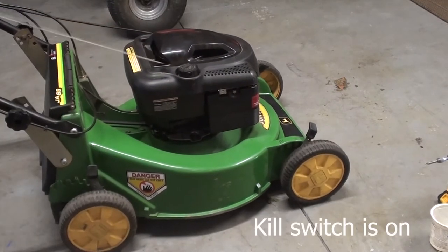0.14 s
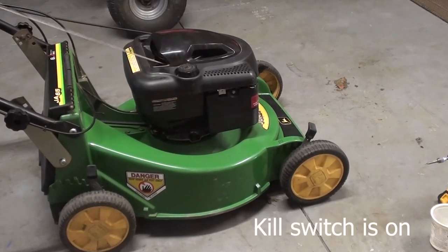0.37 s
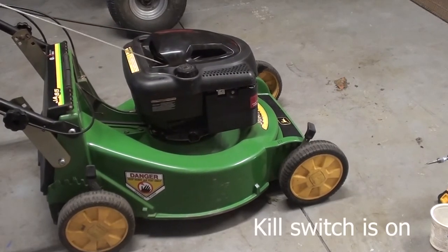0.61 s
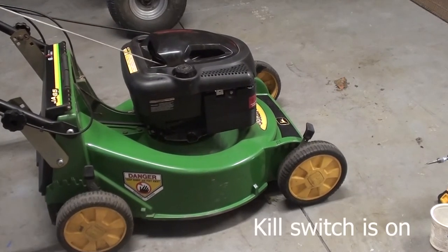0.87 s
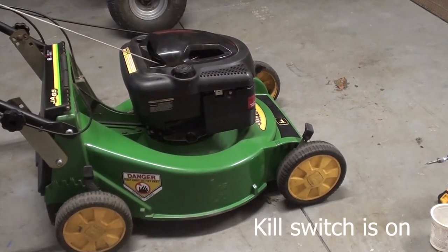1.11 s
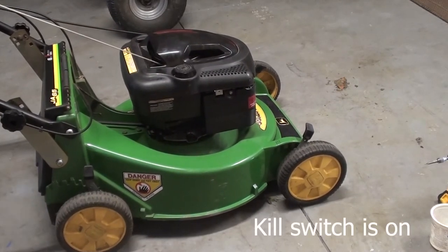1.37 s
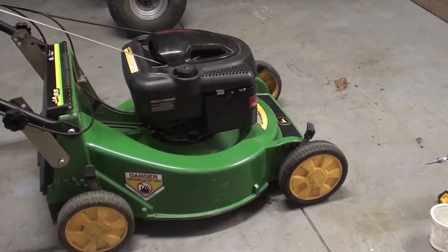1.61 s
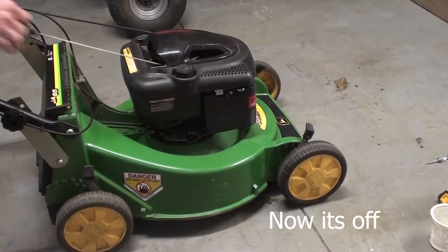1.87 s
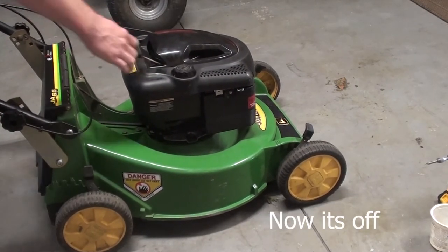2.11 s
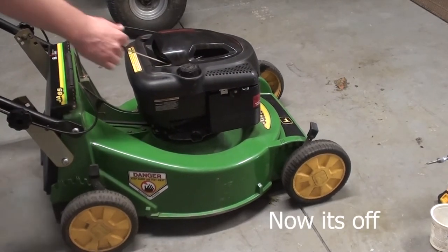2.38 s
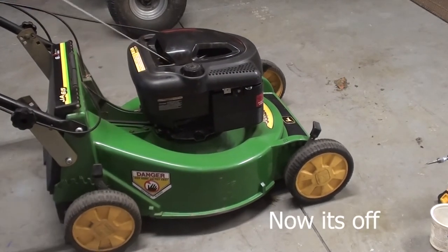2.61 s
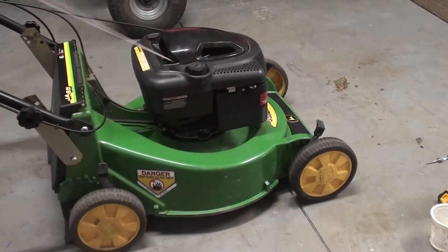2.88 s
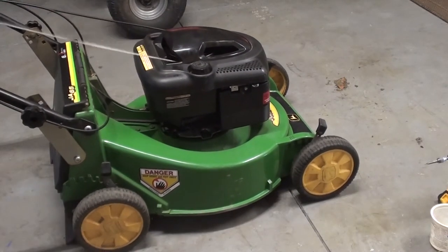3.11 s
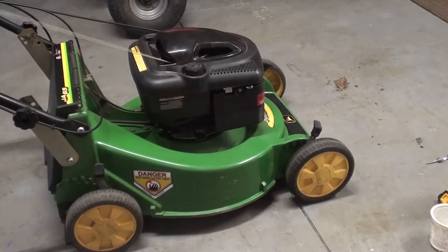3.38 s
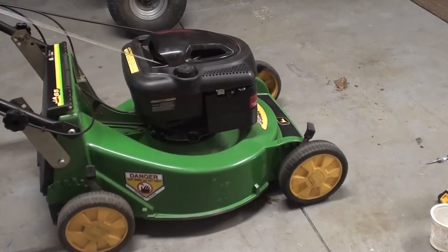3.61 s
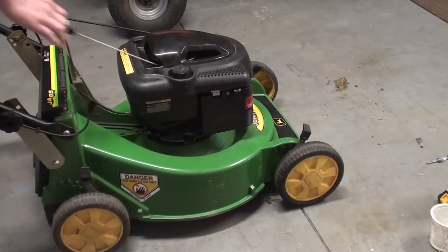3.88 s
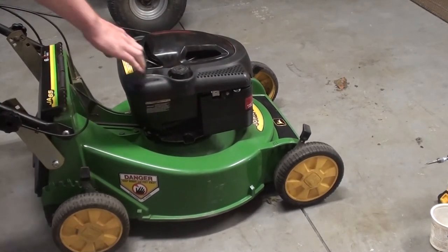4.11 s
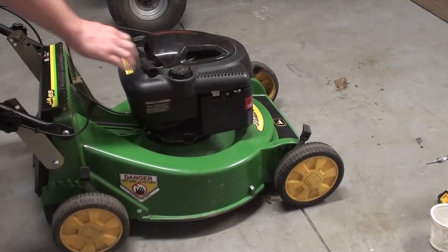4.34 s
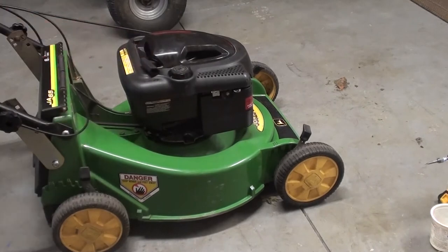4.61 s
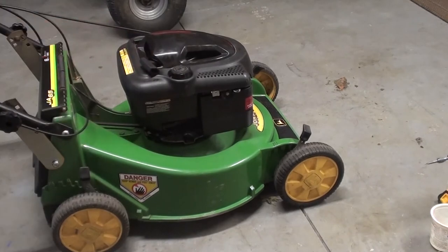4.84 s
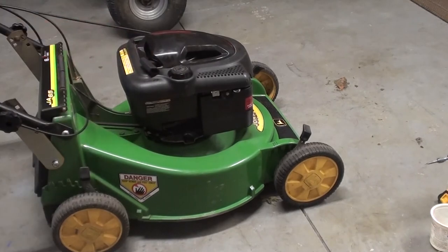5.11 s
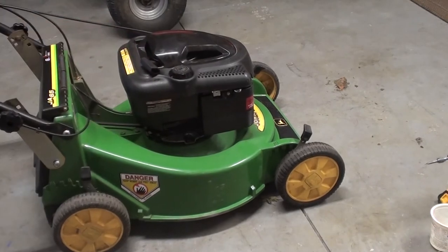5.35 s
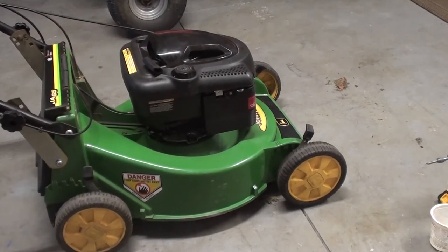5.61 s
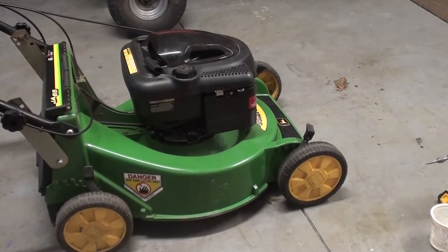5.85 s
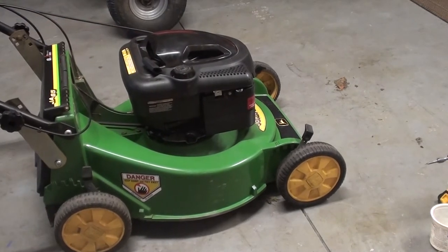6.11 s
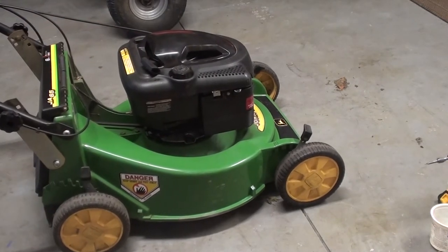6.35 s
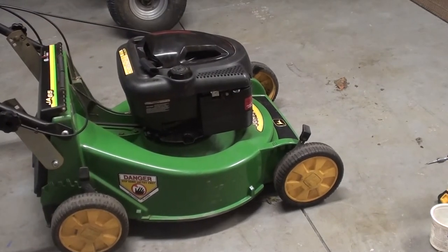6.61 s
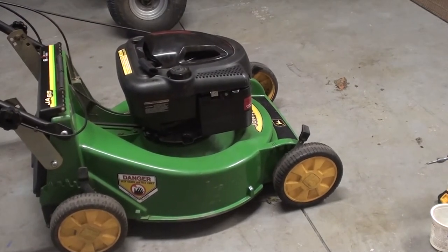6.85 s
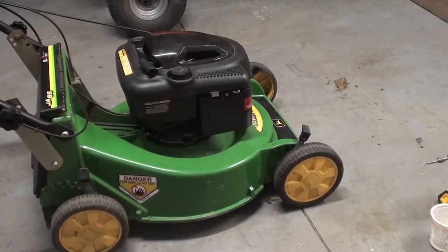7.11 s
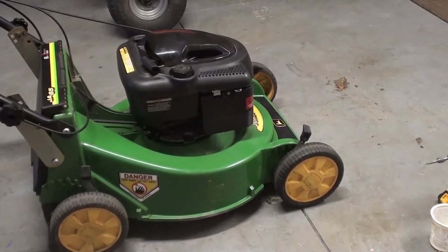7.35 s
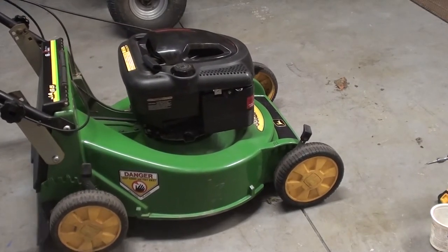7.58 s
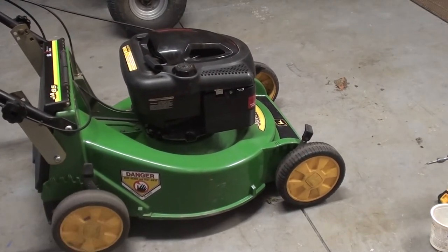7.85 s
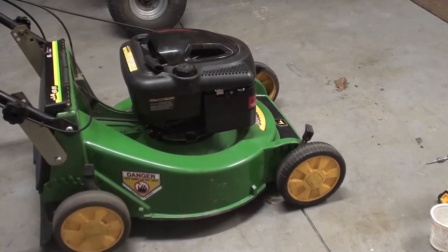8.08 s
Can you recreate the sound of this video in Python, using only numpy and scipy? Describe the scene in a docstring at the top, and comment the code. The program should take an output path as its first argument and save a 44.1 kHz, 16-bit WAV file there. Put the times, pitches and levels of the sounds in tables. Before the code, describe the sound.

Quiet foot scrapes and clicks, a sharp ratcheting cord pull with plastic slaps, then a one-cylinder lawn mower engine catches and runs on steadily.

```python
"""Feet shuffle, clothes rustle and a handle bar ticks and squeaks in a concrete garage, on a mono camera microphone.
Then the starter cord is yanked: the pawls catch, the steel cup rings and rope and grip slap the plastic cover.
The one-cylinder four-stroke engine of a push mower stumbles up to its governed speed and runs on.
Puffs through a filter make the exhaust note; shaped noise makes roar, clatter, panels and scrapes; decaying
sines make the blows. Filtered noise makes the low sway of air and hand at the microphone."""
import sys
import numpy as np
from scipy import signal
from scipy.fft import rfft, irfft, next_fast_len
from scipy.io import wavfile
from scipy.ndimage import uniform_filter1d, map_coordinates

SR = 44100
rng = np.random.default_rng(int(sys.argv[2]) if len(sys.argv) > 2 else 0)


def natural_amplitude(level_db):
    """Convert a level in decibels to a linear amplitude factor, elementwise."""
    exponent = np.asarray(level_db, float) / 20
    return 10 ** exponent


def log_audio(samples):
    """Write samples as a 16-bit WAV file to the path given in sys.argv[1]."""
    # one column per channel
    frames = np.atleast_2d(samples).T
    # limit to full scale, then quantise
    limited = np.clip(frames, -1, 1)
    pcm = np.round(limited * 32767).astype(np.int16)
    wavfile.write(sys.argv[1], SR, pcm)


N = 362502
T = np.arange(N) / SR  # time_s of each sample
M = 2 * next_fast_len(N // 2 + SR // 4)  # padded length of the whole-scene filters, samples
F = np.fft.rfftfreq(M, 1 / SR)  # their bins, hz

# In spectra and mode lists the level is relative; the sources set the final loudness.

# Air and hand sway at the microphone [time_s, level_db]
SWAY_LEVEL = [(0.0, -27), (0.13, -31), (0.64, -33.5), (0.78, -46), (1.28, -43.5), (1.36, -30.5), (1.8, -41),
              (1.97, -27.5), (2.13, -39), (2.22, -32), (2.33, -40), (2.5, -29), (2.8, -22), (2.95, -29),
              (3.25, -21), (3.64, -30), (3.96, -31), (4.05, -43), (8.22, -42)]
# Colour of that sway [freq_hz, density_db]
SWAY_SPECTRUM = [(1, 7), (4, 9.5), (10, 4.5), (25, -5.5), (50, -15.5), (90, -62)]
# The room's answer [freq_hz, t60_s]
GARAGE_DECAY = [(100, 0.59), (1000, 0.91), (5000, 0.15), (14000, 0.13)]

# Moving about [time_s, shuffle_db, rustle_db]
STIR = [(0.0, -36.5, -47), (0.07, -37, -47), (0.22, -43.5, -52.5), (0.27, -45.5, -51), (0.37, -47, -61),
        (0.47, -58, -68), (0.58, -53.5, -62), (0.7, -62.5, -72), (0.8, -56, -64), (0.94, -55.5, -66),
        (1.2, -52.5, -59.5), (1.25, -50, -50), (1.42, -52.5, -65), (1.61, -47.5, -56.5), (1.76, -59.5, -65),
        (1.83, -54, -56), (1.94, -56.5, -80), (2.29, -53.5, -47), (2.43, -56, -60), (2.47, -36, -55),
        (2.53, -45, -44), (2.56, -44, -49), (2.6, -46, -54), (2.66, -45, -43)]
# Colour of the shuffling feet [freq_hz, density_db]
SHUFFLE_SPECTRUM = [(120, -46), (200, -3), (238, 2), (845, 0.5), (1340, -2.5), (1470, -6.5), (1640, -5.5),
                    (2300, -9.5), (4000, -12), (5200, -26), (8800, -120)]
# Colour of the rustling clothes [freq_hz, density_db]
RUSTLE_SPECTRUM = [(1470, -20), (2500, 2), (3240, -34), (4050, -3), (10400, -2.5), (13200, -4),
                   (15600, -34)]
# Footfalls and bumps [time_s, level_db, hold_s]
THUDS = [(0.07, -36.5, .03), (0.6, -60, 0.018), (1.6, -63, .02), (1.8, -70, .01), (1.93, -60, .01),
         (2.28, -69, .02), (2.54, -59, .03), (2.67, -39, .02)]
# Handle, cable and grip contacts [start_s, relative_level_db, body_over_it_db]
TICKS = [(0.0587, -19.5, -23), (0.2794, -35, -10), (0.338, -42, 4), (0.567, -34, -10), (1.19, -34, 6),
         (1.517, -41, 7), (1.6044, -46, -4), (1.8057, -37.5, 7), (1.865, -36, 2), (2.085, -36, -3),
         (2.1755, -41, -6), (2.4418, -20, -8), (2.4569, -20.5, 14), (2.492, -31, 18), (2.5744, -32, 7),
         (2.6208, -26, 10), (2.652, -15.5, 5.5), (2.689, -16.5, 9)]
# A dry plastic click and its rebound [start_s, level_db]
CLICKS = [(.5283, -33), (.5355, -41)]
# Modes of the cover struck by the grip [freq_hz, relative_level_db, t60_s]
COVER_MODES = [(617, -23, 0.093), (843, -3.5, 0.21), (985, -7, 0.09), (1184, -4, 0.13), (1410, -19, 0.077),
               (1900, -7, .08)]
# Cable spring tightening [time_s, pitch_hz]
SPRING_PITCH = [(1.81, 815), (1.935, 965), (1.955, 925), (2.02, 945), (2.08, 985), (2.12, 1060)]
# Squeaks of that spring [time_s, level_db, hold_s]
SPRING_CREAKS = [(1.815, -56, .08), (1.91, -50, .025), (1.965, -59, .03), (2.09, -59, .025)]
# A second, higher squeak [time_s, pitch_hz]
SHEATH_PITCH = [(1.95, 1050), (2.0, 1095), (2.06, 1100)]
# When it sounds [time_s, level_db, hold_s]
SHEATH_CREAKS = [(1.97, -57, .085)]

# Starter knocks and rope slaps [start_s, relative_level_db, body_over_it_db]
KNOCKS = [(2.707, -15, -14), (2.7581, -17, -10), (2.7887, -3.5, -20), (2.8783, -10, -9), (2.9207, -7, -9),
          (3.03, -4.5, -3.5), (3.1248, -5.5, -0.5), (3.255, -4, -6.5), (3.384, -9.5, -2),
          (3.4245, -7.5, -15), (3.6275, -10, -18), (3.667, -13.5, -4), (3.7485, -11, -21)]
# Bright noise of a contact [freq_hz, density_db]
SLAP_SPECTRUM = [(700, -36), (1500, 7), (3000, 0), (4200, 2), (8000, 0.5), (12000, 4), (14000, 0.5),
                 (15600, -16)]
# Resonances of the plastic cover [freq_hz, width_hz, relative_level_db]
BODY_MODES = [(456, 59, -6.5), (810, 160, -5), (1190, 330, -2), (1470, 930, -2.5)]
# Modes of the steel pawl [freq_hz, relative_level_db, t60_s]
PAWL_MODES = [(4340, -3, 0.039), (4680, -1.5, 0.027), (5430, -8, 0.033), (7300, -7, 0.051),
              (8400, -10, 0.03)]
# Pawls grabbing the cup [time_s, level_db, drag_s]
GRABS = [(2.444, -39.5, .017), (2.724, -34, .004), (2.758, -29, .012), (2.797, -21, .03),
         (2.845, -25, .025), (2.882, -23, .012), (2.93, -38, .03)]
# Resonances of the starter cup [freq_hz, width_hz, relative_level_db]
CUP_MODES = [(3500, 40, -15), (7110, 220, 0), (8450, 330, -2), (9300, 300, -11), (10840, 160, -3),
             (13200, 500, -11)]
# The cup's lowest mode singing [time_s, level_db, hold_s]
SQUEALS = [(2.82, -32, .09), (2.94, -36, .07), (2.447, -50, .04)]
# Recoil ratchet, jerks of the cord [time_s, level_db, hold_s]
RATCHET_JERKS = [(0.0, -37, .005), (0.062, -33.5, 0.0043), (0.258, -46.5, 0.035), (0.34, -43.5, .005),
                 (2.5, -49, .03), (2.578, -32, 0.011), (2.622, -45, .008), (2.653, -29, 0.01),
                 (2.692, -28.5, 0.011), (2.77, -31, 0.039)]
# Housing under the ratchet [freq_hz, width_hz, relative_level_db]
HOUSING_MODES = [(1120, 410, -4), (1790, 760, 5), (2020, 680, 2.5), (2450, 120, -11)]
# Rasp of the cord, faster as it runs out [time_s, pitch_hz]
RASP_PITCH = [(2.572, 1550), (2.6, 2000), (2.625, 2600)]
# Pull that makes it rasp [time_s, level_db, hold_s]
RASP_PULL = [(2.578, -40, .04)]

# Crank speed, before a slight waver [time_s, firings_per_s]
SPEED = [(2.66, 11.6), (2.81, 13.9), (3.03, 19.5), (3.13, 21.6), (3.31, 21.6), (3.43, 24.7), (3.52, 25.5),
         (3.74, 25.25), (4.22, 25.9), (4.55, 25.8), (6.31, 25.8), (6.44, 25.7), (7.04, 25.7), (7.18, 26.1),
         (7.37, 26.1), (7.52, 25.7), (7.71, 25.6), (7.85, 25.9), (8.22, 25.75)]
# Main engine layers [time_s, exhaust_db, roar_db, clatter_db]
ENGINE_LEVELS = [(2.6, -44, -37, -65), (2.71, -23, -27.5, -28), (2.87, -19, -21.5, -39),
                 (3.13, -14, -21, -28.5), (3.45, -14.5, -16.5, -22), (3.66, -14, -17.5, -23.5),
                 (3.96, -16, -15.5, -23.5), (4.22, -16.5, -16, -24.5), (4.3, -17, -12.5, -24),
                 (4.38, -17.5, -16, -25), (4.55, -18, -15.5, -24.5), (4.84, -16.5, -17.5, -24.5),
                 (5.14, -16, -18.5, -24), (5.4, -16.5, -18, -25), (7.15, -16, -19.5, -23.5),
                 (7.28, -16.5, -18, -23), (7.66, -15, -20, -26), (8.22, -16.5, -19, -26)]
# Cold running [time_s, firing_scatter_db, ragged_share_0_to_1]
COLD_RUNNING = [(2.6, 3, .92), (3.15, 3, .85), (3.5, 3, .55), (3.8, 2.5, .4), (4.05, 1.1, .03),
                (4.8, .9, .008)]
# Short dips of the exhaust: weak firings of the cold engine [time_s, dip_db]
STUMBLES = [(3.02, -.5), (3.2, -5), (3.54, -6), (3.6, -8), (3.72, -6), (3.845, -5)]
# Exhaust note in five stances as the mower creeps over the floor; each stance [multiple_of_firing_rate, level_db]
STANCE_NOTES = [
    [(1, -7), (2, -5), (3, -11.5), (4, 1.5), (5, 3), (6, 0.5), (7, -10), (8, -9.5), (9, 0.5), (10, -5.5),
     (11, -6.5), (12, -7), (13, -8), (14, -21), (15, -5.5), (16, -5), (17, -9.5), (18, -2.5), (19, -1.5),
     (20, -7), (21, -19), (22, -3), (23, -17), (24, -3), (25, -29), (26, -15), (27, -23), (28, -0.5),
     (29, -13), (30, -16), (31, -19), (32, -16), (33, -28), (34, -21), (35, -27), (36, -23), (37, -13),
     (38, -19.5), (39, -14), (40, -26)],
    [(1, -23), (2, -8.5), (3, -23), (4, 0), (5, 2), (6, -0.5), (7, -20), (8, -10), (9, -4), (10, -25),
     (11, -6), (12, -8.5), (13, -20), (14, -11), (15, -9), (16, -14), (17, -5), (18, -1.5), (19, -5.5),
     (20, -4.5), (21, -23), (22, -9), (23, -6), (24, -19), (25, -9), (26, -22), (27, -24), (28, -3.5),
     (29, -16), (30, -12), (31, -18), (32, -11), (33, -28), (34, -15), (35, -33), (36, -20), (37, -16),
     (38, -8.5), (39, -24), (40, -26)],
    [(1, -18), (2, -10), (3, -17), (4, -1), (5, 1.5), (6, 1.5), (7, -22), (8, -7), (9, -5.5), (10, -12.5),
     (11, -4), (12, -14), (13, -10), (14, -26), (15, -7.5), (16, -15.5), (17, -2), (18, -2.5), (19, 0),
     (20, -12), (21, -34), (22, -3), (23, -4.5), (24, -5.5), (25, -22), (26, -3), (27, -34), (28, -5),
     (29, -41), (30, -6), (31, -29), (32, -14), (33, -16), (34, -25), (35, -22), (36, -9), (37, -24),
     (38, -27), (39, -21), (40, -14)],
    [(1, -17), (2, -12), (3, -24), (4, -0.5), (5, -2), (6, 1.5), (7, -21), (8, -10.5), (9, -5.5), (10, -26),
     (11, -17), (12, -5.5), (13, -15), (14, -20), (15, -20), (16, -26), (17, -9.5), (18, -9), (19, -17),
     (20, -24), (21, -26), (22, -16.5), (23, -12), (24, -0.5), (25, -12), (26, -2), (27, -16), (28, -26),
     (29, -26), (30, -8), (31, -16), (32, -25), (33, -20), (34, -20), (35, -25), (36, -20), (37, -12),
     (38, -4), (39, -37), (40, -18)],
    [(1, -17), (2, -10), (3, -18), (4, -1), (5, 1), (6, 4), (7, -15), (8, -9.5), (9, -5), (10, -13),
     (11, -6.5), (12, -2.5), (13, -11), (14, -21), (15, -8.5), (16, -23), (17, -10), (18, -8), (19, -13),
     (20, -18), (21, -22), (22, -5), (23, -9.5), (24, -5), (25, -13.5), (26, 0), (27, -17), (28, -15),
     (29, -7.5), (30, -14), (31, -20), (32, -17), (33, -24), (34, -15), (35, -21), (36, -28), (37, -10),
     (38, -13), (39, -37), (40, -10)],
]
# Path between the stances [time_s, stance_0_to_4]
STANCE_PATH = [(4.6, 0), (4.9, 1), (5.85, 1.1), (6.1, 2), (7.06, 2.05), (7.16, 3), (7.5, 3), (7.72, 4)]
# Delay of each band of the exhaust pulse, which spreads it over the cycle [freq_hz, delay_s]
PULSE_DELAY = [(60, .034), (90, .022), (116, .038), (142, .0315), (170, .014), (230, .022), (300, .01),
               (400, .008), (440, .01), (520, .005), (600, .018), (680, .002), (760, .024), (900, .012),
               (1100, .03)]
# Colour of the ragged burning [freq_hz, density_db]
RAGGED_SPECTRUM = [(24, -36), (40, -4), (152, 1.5), (209, -6.5), (310, -1), (420, -10), (460, 2),
                   (535, -28), (595, -11), (1500, -24), (1950, -44), (3300, -120)]
# Afterburn in the cold muffler [time_s, level_db, hold_s]
AFTERBURN = [(3.045, -9, .085), (3.2, -15, .12), (3.455, -7, .03), (3.62, -7, .065), (3.79, -12, .01)]
# Muffler chambers that it excites [freq_hz, width_hz, relative_level_db]
CHAMBER_RESONANCES = [(307, 26, -15), (406, 150, -11), (469, 26, -5.5), (595, 13, -13)]
# Single strong firings of the spin-up [start_s, pipe_boom_db, chamber_knock_db]
CHUGS = [(2.75, -22, -24), (2.825, -24, -17), (2.888, -24, -16), (2.95, -20, -22), (3.04, -20, -16),
         (3.085, -12, -18), (3.125, -16, -14), (3.225, -20, -15), (3.37, -17, -16), (3.46, -10, -24),
         (3.662, -10, -24), (3.785, -10, -24), (3.905, -14, -28), (3.943, -13, -28), (3.982, -13, -28)]
# Pipe boom of those firings [freq_hz, relative_level_db, t60_s]
BOOM_MODES = [(147, 0, 0.17)]
# Chamber knock of those firings [freq_hz, relative_level_db, t60_s]
KNOCK_MODES = [(304, 0, 0.14)]
# Colour of the turbulent roar [freq_hz, density_db]
ROAR_SPECTRUM = [(20, -28), (60, -33), (180, -16), (300, -3), (500, 2), (750, -2.5), (1000, -2), (1150, -8),
                 (1350, -5), (2200, -9), (3500, -21), (6000, -38), (12000, -100)]
# Gain of the low part of the roar's free noise [time_s, gain_db]
LOW_ROAR_GAIN = [(4.5, 0), (4.9, -4), (5.6, -5.5), (6.3, -3), (7.0, -3.5), (7.2, 1), (8.22, 1)]
# Colour of the valve clatter [freq_hz, density_db]
CLATTER_SPECTRUM = [(1500, -3.5), (3000, 1), (5000, -4), (8000, -8), (12000, -9), (13800, -13.5),
                    (14400, -12), (14800, -60)]
# Compression strokes at low speed [time_s, level_db]
THUMP_LEVEL = [(2.6, -46), (2.72, -24), (2.95, -29), (3.15, -31), (3.8, -42), (4.1, -60)]
# Thin panel shaken by the engine [freq_hz, width_hz, relative_level_db]
SHROUD_MODES = [(4910, 120, 4)]
# How hard it buzzes [time_s, level_db]
SHROUD_SHAKE = [(3.5, -58), (4.3, -49), (5.3, -40), (6.2, -39.5), (6.58, -38), (7.26, -42), (7.45, -45),
                (8.22, -43)]
# Steel deck [freq_hz, width_hz, relative_level_db]
DECK_MODES = [(1306, 120, 0)]
# The deck ringing up [time_s, level_db, hold_s]
DECK_SURGES = [(4.14, -30, 0.028), (4.42, -27, 0.062), (5.11, -26, 0.053), (6.32, -31, .05)]
# Thin metallic whine [freq_hz, width_hz, relative_level_db]
WHINE_MODES = [(10830, 50, -45), (11520, 45, -45)]
# Its swell and fade [time_s, gain_db]
WHINE_GAIN = [(3.6, -3), (4.1, 9), (4.7, 3), (5.8, 2), (6.1, -13), (6.7, 1), (7.1, 0), (8.0, -1),
              (8.22, -5)]


def unit(x):
    """Scales x to rms 1."""
    return x / np.sqrt(np.mean(x ** 2) + 1e-20)


def along(points, hz):
    """Reads (hz, value) points on a log frequency axis."""
    f, v = np.transpose(points)
    return np.interp(np.log(hz + 1), np.log(f + 1), v)


def curves(rows):
    """One value per sample for each column after the time."""
    s, *cols = np.transpose(rows)
    return [np.interp(T, s, c) for c in cols]


def during(rows, fade=0.011):
    """1 while a table lasts, fading to 0 outside over fade seconds."""
    return np.clip(np.minimum(T - rows[0][0], rows[-1][0] - T) / fade + 1, 0, 1)


def wobble(rate):
    """A smooth random curve with rate knots a second."""
    return map_coordinates(rng.standard_normal(int(N * rate / SR) + 4), [T * rate])


def bursts(rows, rise_s, fall):
    """Gain of (s, dB, hold s) events: a ramp up to the time, a hold, then a fall of so many dB per s."""
    gain = np.zeros(N)
    for s, db, hold in rows:
        ramp = np.clip((T - s) / rise_s + 1, 0, 1) ** 2
        gain += ramp * natural_amplitude(db - fall * np.maximum(T - s - abs(hold), 0))
    return gain


def patchy(x, depth_db, size=512):
    """x with patches of random gain in time and frequency."""
    z = signal.stft(x, nperseg=size)[2]
    field = uniform_filter1d(rng.standard_normal(z.shape), 5, 0)
    field = uniform_filter1d(field, 12, 1)
    return signal.istft(z * natural_amplitude(depth_db * unit(field)), nperseg=size)[1][:N]


def coloured(x, spectrum, delay=((1, 0),)):
    """x through the causal filter with these (hz, dB) gains and (hz, s) delays."""
    # Folding the cepstrum forward gives the minimum-phase response.
    cepstrum = irfft(np.log(natural_amplitude(along(spectrum, F))), M)
    cepstrum[1:M // 2] *= 2
    cepstrum[M // 2 + 1:] = 0
    lag = 2 * np.pi * np.cumsum(along(delay, F)) * F[1]
    return irfft(rfft(x, M) * np.exp(rfft(cepstrum) - 1j * lag), M)[:N]


def hiss(spectrum, patchy_db=None):
    """Coloured noise of rms 1, patchy if asked."""
    white = rng.standard_normal(N)
    if patchy_db:
        white = patchy(white, patchy_db)
    return unit(irfft(rfft(white, M) * natural_amplitude(along(spectrum, F)), M)[:N])


def rattle(peaks, drive=1):
    """Noise shaped by a drive and singing in narrow resonances, each at its own level."""
    response = 0
    for k, (centre, width, db) in enumerate(peaks):
        strength = (-1) ** k * natural_amplitude(db) * np.sqrt(SR / np.pi * width)
        response = response + strength * 1j * F / (centre * centre - F * F + 1j * F * width)
    return irfft(rfft(drive * rng.standard_normal(N), M) * response, M)[:N]


def struck(rows, modes, ring_db, scatter_db=4):
    """Every blow rings the same decaying modes, each at a slightly new strength."""
    out, t = np.zeros(N), T[:SR // 4]
    for s, db in rows:
        for hz, level, t60 in modes:
            strength_db = db + ring_db + level + scatter_db * rng.standard_normal()
            out[round(s * SR):][:len(t)] += natural_amplitude(strength_db - 60 * t / t60) * np.sin(2 * np.pi * hz * t)
    return out


def squeak(rows, gain):
    """Stick-slip as a tone of wavering pitch and level with a weak octave."""
    phase = 2 * np.pi * np.cumsum(curves(rows)[0] * (1 + .008 * wobble(60))) / SR
    return gain * natural_amplitude(2.8 * wobble(50.8)) * (np.sin(phase) + 0.22 * np.sin(2 * phase))


def knocks(rows, t60_top, longer, crack_db, body_db, snap=1.5, snap_t60=0.02):
    """Each contact is a snap, bright noise and a duller burst from the cover; harder ones ring longer."""
    # t60_top: s at 0 dB; longer: s per dB
    bright, dull, t = np.zeros(N), np.zeros(N), T[:SR // 2]
    for s, db, rel_db in rows:
        t60 = max(t60_top + longer * db, .03)
        shape = natural_amplitude(db - 60 * t / t60) * (1 + snap * natural_amplitude(-60 * t / snap_t60))
        bright[round(s * SR):][:len(t)] += shape ** 2
        dull[round(s * SR):][:len(t)] += (shape * natural_amplitude(rel_db)) ** 2
    crack = natural_amplitude(crack_db) * np.sqrt(bright) * hiss(SLAP_SPECTRUM)
    return crack + rattle(BODY_MODES, natural_amplitude(body_db) * np.sqrt(dull))


def microphone_sway():
    """Air and hand sway push the microphone with low noise of drifting level."""
    level_db = curves(SWAY_LEVEL)[0] + 3 * wobble(3.59)
    return natural_amplitude(level_db) * hiss(SWAY_SPECTRUM)


def garage(x):
    """The walls answer 9 ms late, about 3 m of path, and each frequency dies at its own speed."""
    hz, t, z = signal.stft(rng.standard_normal(SR // 2), SR, nperseg=256)
    decay = natural_amplitude(-60 * t / along(GARAGE_DECAY, hz)[:, None])
    tail = signal.istft(z * decay, SR, nperseg=256)[1]
    late = np.pad(x, (400, 0))
    return signal.fftconvolve(late, tail / np.linalg.norm(tail))[:N]


def stirring():
    """Footfalls are low thuds; soles and clothes rub as noise of changing level."""
    shuffle_db, rustle_db = curves(STIR)
    thud_gain = natural_amplitude(-63) + bursts(THUDS, rise_s=0.19, fall=130)  # over a faint steady floor
    stir = thud_gain * hiss([(30, -18), (70, 11.0), (150, 5.5), (250, -11), (500, -30)])
    stir += natural_amplitude(shuffle_db) * hiss(SHUFFLE_SPECTRUM, patchy_db=2.5)
    stir += natural_amplitude(rustle_db) * hiss(RUSTLE_SPECTRUM)
    return stir * during(STIR, fade=0.055)


def handle():
    """Grip contacts tick and ring the cover, a plastic click rebounds and a tightening cable spring squeaks."""
    rise_s, fall = 0.03, 400  # s; dB per s
    spring = squeak(SPRING_PITCH, bursts(SPRING_CREAKS, rise_s, fall))
    spring += squeak(SHEATH_PITCH, bursts(SHEATH_CREAKS, rise_s, fall))
    click_t60 = 0.0052  # s
    click_gain = sum((T >= s) * natural_amplitude(db - 60 * abs(T - s) / click_t60) for s, db in CLICKS)
    click = click_gain * hiss(SLAP_SPECTRUM)
    ticks = knocks(TICKS, 0.3, 0.0023, crack_db=-21.5, body_db=-17.0, snap=1.1, snap_t60=0.017)
    ticks += struck([(s, db + rel_db) for s, db, rel_db in TICKS], COVER_MODES, ring_db=-20.5)
    return spring + click + ticks


def starter_cup():
    """The pawls scrape the steel cup into ringing, and its lowest mode sings."""
    grab_gain = bursts(GRABS, rise_s=.006, fall=300)
    cup = rattle(CUP_MODES, grab_gain * natural_amplitude(3 * wobble(110)))
    pitch_hz = 3540 * (1 + .008 * wobble(25))
    squeal_gain = bursts(SQUEALS, rise_s=.012, fall=150) * natural_amplitude(3.4 * wobble(90))
    return cup + squeal_gain * np.sin(2 * np.pi * np.cumsum(pitch_hz) / SR)


def ratchet():
    """Jerks of the cord make the ratchet chatter in its housing, and the cord rasps as it runs out."""
    rise_s, fall = 0.0063, 330  # s; dB per s
    chatter = natural_amplitude(2.8 * wobble(45) + 3.6 * wobble(220))
    housing = rattle(HOUSING_MODES, bursts(RATCHET_JERKS, rise_s, fall) * chatter)
    rasp_gain = bursts(RASP_PULL, rise_s, fall) * natural_amplitude(3.5 * wobble(300))
    return housing + squeak(RASP_PITCH, rasp_gain)


def starter():
    """Cup and ratchet sound under the pull; the pawls ring as struck steel; rope and grip slap the cover."""
    pawl = struck([row[:2] for row in KNOCKS], PAWL_MODES, ring_db=-13.5)
    slaps = knocks(KNOCKS, 0.61, 0.011, crack_db=-13.5, body_db=-8.5, snap=1.13, snap_t60=0.026)
    return starter_cup() + ratchet() + pawl + slaps


def panels(cycles):
    """Engine vibration makes shroud, deck and thin metal sing in narrow resonances."""
    shake_db = curves(SHROUD_SHAKE)[0] + 1.2 * np.cos(4 * np.pi * cycles)  # one swell a revolution
    shroud = rattle(SHROUD_MODES, natural_amplitude(shake_db) * during(SHROUD_SHAKE, fade=.3))
    deck_gain = natural_amplitude(-31) * during(SHROUD_SHAKE, fade=0.24)  # steady ring
    deck_gain += bursts(DECK_SURGES, rise_s=0.061, fall=40)
    deck = rattle(DECK_MODES, deck_gain)
    whine_gain = natural_amplitude(curves(WHINE_GAIN)[0] + wobble(5)) * during(WHINE_GAIN)
    return shroud + deck + rattle(WHINE_MODES, whine_gain)


def compression_thump(cycles):
    """Compression strokes at low speed: two sines locked to the crank, at the firing rate and its double."""
    strokes = np.sin(2 * np.pi * cycles) + 1.9 * np.sin(4 * np.pi * cycles)
    return natural_amplitude(curves(THUMP_LEVEL)[0]) * strokes


def valve_clatter(cycles, level_db):
    """Bright noise peaks as the valves seat, once a revolution or twice a firing cycle."""
    seating_db = 2 * abs(np.cos(2 * np.pi * cycles)) ** 14  # the power narrows the peaks
    return natural_amplitude(level_db + 0.14 * wobble(4.07) + seating_db) * hiss(CLATTER_SPECTRUM, patchy_db=1.0)


def recurring(cycles):
    """Noise tied to the crank angle: alike from firing to firing, slowly renewed."""
    renewal, low_hz, top_hz = 5, 800, 2600  # firings; edges of the recurring band
    field = rng.standard_normal((int(cycles[-1] / renewal) + 3, 1024))
    x = map_coordinates(field, [cycles / renewal, cycles % 1 * 1023], order=1)
    band = 1 / (1 + (low_hz / (F + 1)) ** 4) / (1 + (F / top_hz) ** 2)
    return unit(irfft(rfft(x, M) * natural_amplitude(along(ROAR_SPECTRUM, F)) * band, M)[:N])


def turbulent_roar(cycles, level_db):
    """Turbulent gas is noise swelling with the firings; the less ragged the burning, the more of it recurs."""
    rush = hiss(ROAR_SPECTRUM, patchy_db=1)
    low = irfft(rfft(rush, M) / (1 + (F / 820) ** 8), M)[:N]  # below 820 Hz
    rush += (natural_amplitude(curves(LOW_ROAR_GAIN)[0]) - 1) * low
    share = .6 * (1 - curves(COLD_RUNNING)[1])
    swell_db = 0.086 * wobble(2.7) + 0.37 * np.cos(2 * np.pi * cycles - 1.2)
    return natural_amplitude(level_db + swell_db) * (np.sqrt(1 - share) * rush + np.sqrt(share) * recurring(cycles))


def muffler_bark(cycles):
    """Afterburn excites the muffler chambers as noise fading in each cycle; strong firings ring as sines."""
    drive = bursts(AFTERBURN, rise_s=.02, fall=380) * natural_amplitude(-4.5 * (cycles % 1))
    bark = rattle(CHAMBER_RESONANCES, drive)
    bark += struck([(s, db) for s, db, _ in CHUGS], BOOM_MODES, ring_db=-3.5, scatter_db=2.5)
    bark += struck([(s, db) for s, _, db in CHUGS], KNOCK_MODES, ring_db=0.5, scatter_db=3)
    return bark


def exhaust(cycles):
    """One puff per firing rings pipe, deck and floor; a cold engine burns unevenly and raggedly."""
    scatter_db, ragged = curves(COLD_RUNNING)
    at = np.flatnonzero(np.diff(np.floor(cycles)))
    puffs = np.zeros(N)
    puffs[at] = -natural_amplitude(scatter_db[at] * np.clip(rng.standard_normal(len(at)), -2, 1))
    stance, = curves(STANCE_PATH)
    governed = 25.8  # firings per s to which the overtone levels belong
    note = np.zeros(N)
    for k, orders in enumerate(STANCE_NOTES):
        overtones = [(order * governed, db) for order, db in orders]
        colour = [(4.1, -42)] + overtones + [(1200, -33.0), (3000, -60.0)]
        near = np.clip(1 - abs(stance - k), 0, 1)  # crossfade between neighbouring stances
        note += near * unit(coloured(puffs, colour, PULSE_DELAY))
    note = patchy(note, depth_db=1.05, size=4096)  # the overtones drift
    upper = irfft(rfft(note, M) * (F > 200), M)[:N]
    lull_db = -7 * np.exp(-((T - 7.6) / .07) ** 2)  # the upper overtones fade briefly
    note += patchy(upper, 1.7, size=2048) * natural_amplitude(lull_db) - upper  # and flicker faster
    burning = natural_amplitude(-0.5 - 2.5 * (cycles % 1)) * hiss(RAGGED_SPECTRUM)
    return np.sqrt(1 - ragged) * note + np.sqrt(ragged) * burning


def engine():
    """The crank, one cycle per firing, times exhaust, bark, roar, clatter, compression thump and panels."""
    rate, = curves(SPEED)
    cycles = np.cumsum(rate * (1 + .0012 * wobble(5))) / SR + .62
    exhaust_db, roar_db, clatter_db = curves(ENGINE_LEVELS)
    for s, dip_db in STUMBLES:
        exhaust_db = exhaust_db + dip_db * np.exp(-((T - s) / .035) ** 2)
    running = natural_amplitude(exhaust_db) * exhaust(cycles) + muffler_bark(cycles)
    running += turbulent_roar(cycles, roar_db) + valve_clatter(cycles, clatter_db)
    running += compression_thump(cycles)
    return running * during(ENGINE_LEVELS, fade=0.15) + panels(cycles)


def scene():
    """Microphone sway, person, starter with the room's answer and engine, the same in both channels."""
    pull = starter()
    person = stirring() + handle()
    mono = microphone_sway() + person + pull + natural_amplitude(-10.0) * garage(pull) + engine()
    return np.array([mono, mono])


def band_limit(x):
    """A steep low-pass at the top of the band."""
    return signal.sosfilt(signal.butter(12, 15780, fs=SR, output="sos"), x)


def record(dry):
    """Loud peaks are rounded off; the sound ends at 15.8 kHz."""
    top, hard = .76, 4  # ceiling of the amplitude; sharpness of the bend
    soft = dry[0] / (1 + abs(dry[0] / top) ** hard) ** (1 / hard)
    mono = irfft(rfft(soft, M) * (F < 15780), M)[:N]
    return band_limit(np.array([mono, mono]))


dry = scene()
out = record(dry)
log_audio(out)
```